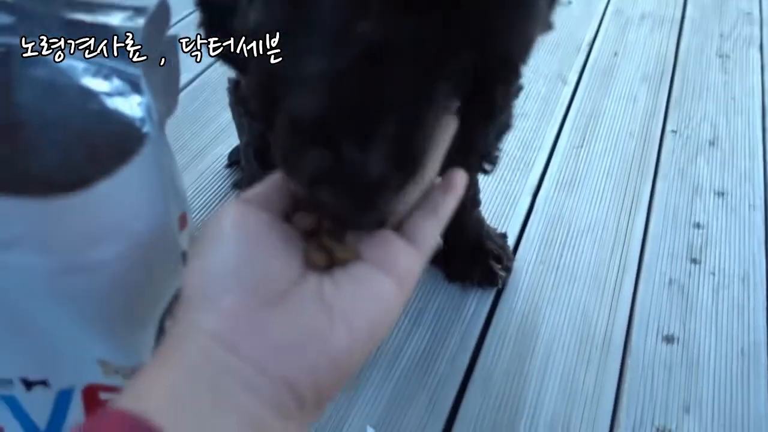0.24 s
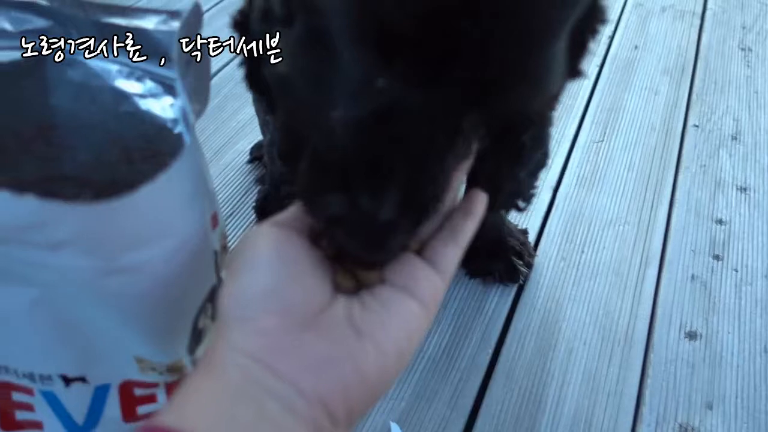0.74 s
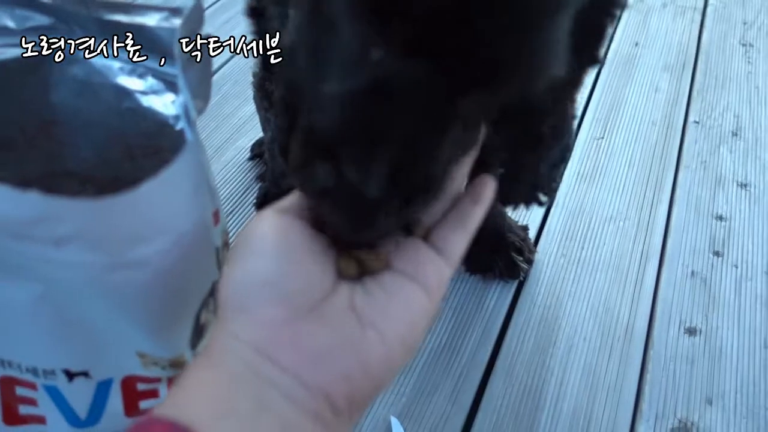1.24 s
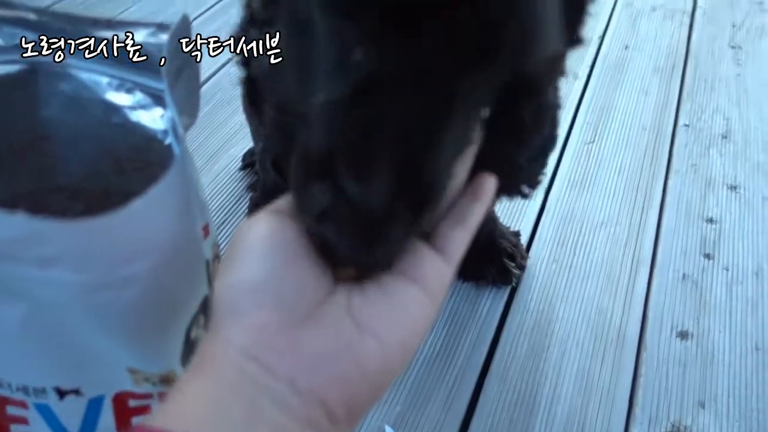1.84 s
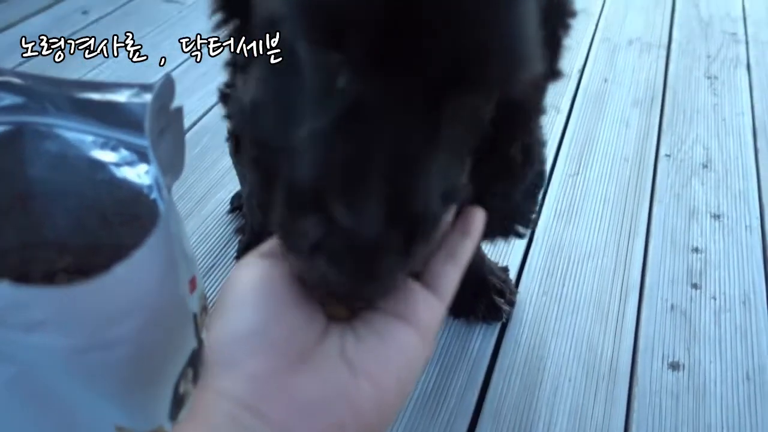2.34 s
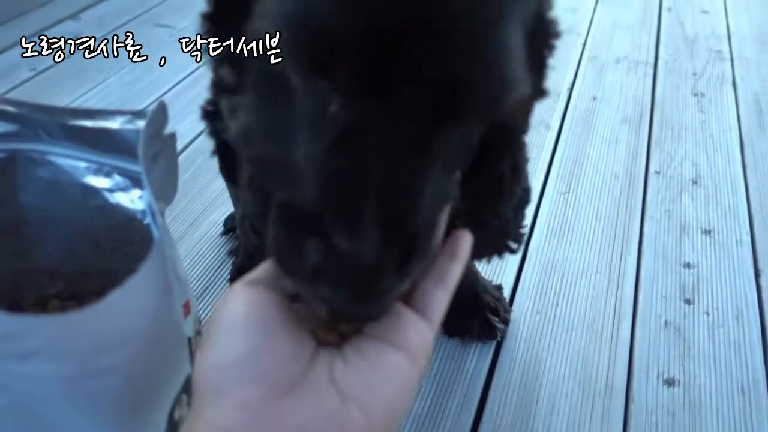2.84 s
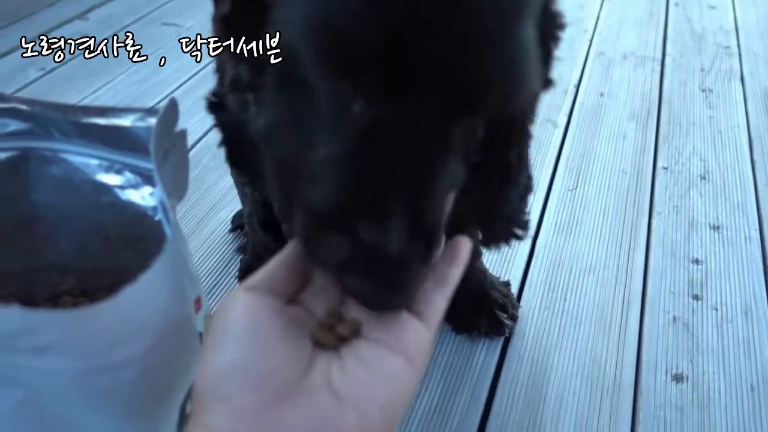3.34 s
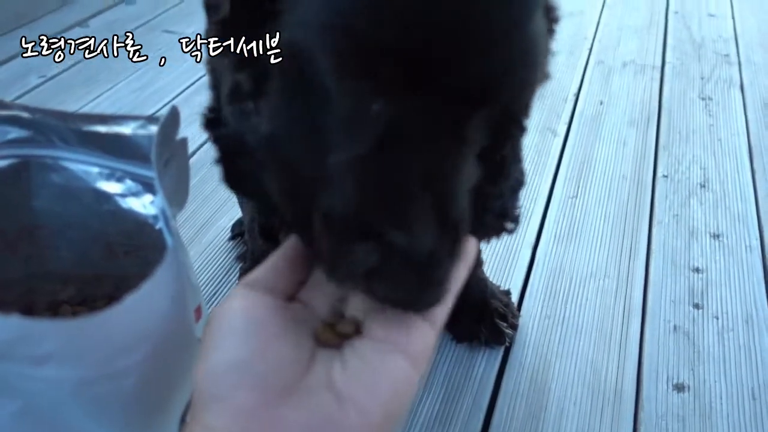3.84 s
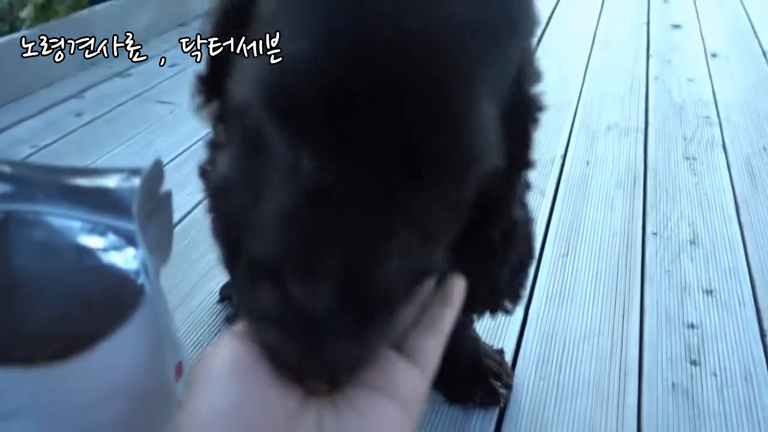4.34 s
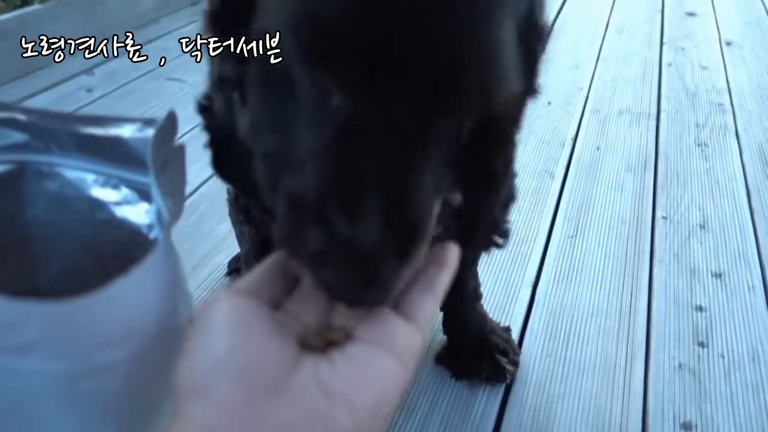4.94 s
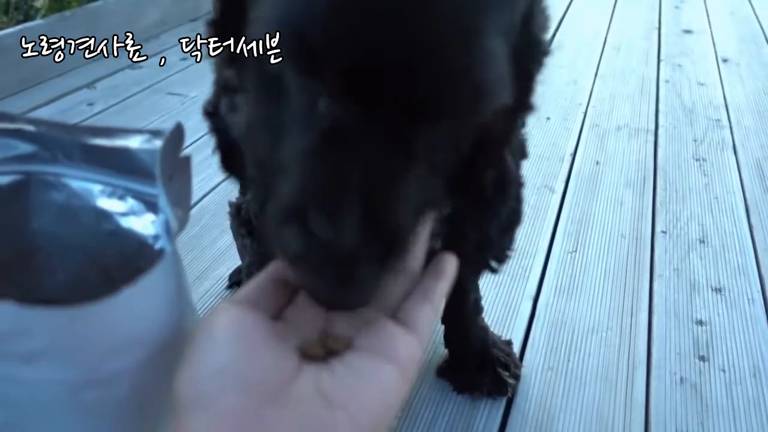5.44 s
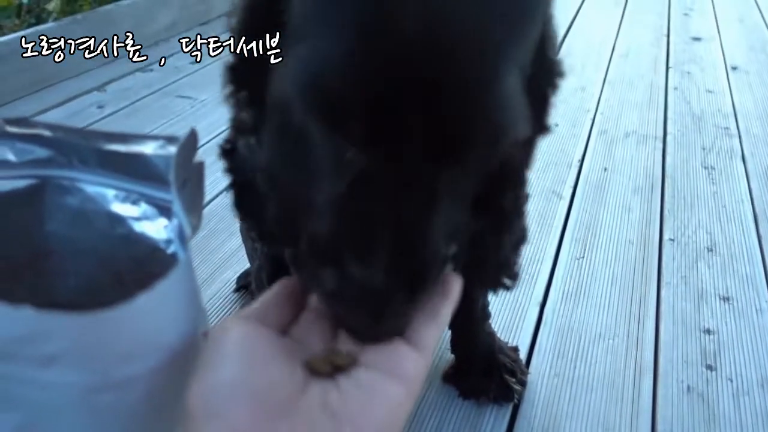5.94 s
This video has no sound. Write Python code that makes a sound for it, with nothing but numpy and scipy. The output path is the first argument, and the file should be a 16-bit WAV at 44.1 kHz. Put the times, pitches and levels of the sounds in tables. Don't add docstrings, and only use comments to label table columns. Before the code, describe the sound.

Dry pellets snap and splinter between a dog's teeth at close range, irregular, with short pauses. Bright ticks at the front teeth alternate with duller, hollow crushing at the back and gritty crumbs. The heaviest cracks come near the middle and again late, followed by small chewing. The open deck adds only a slight short scatter; soft far traffic, barely audible whines and steady hiss lie behind.

```python
import sys
import numpy as np
from scipy import signal
from scipy.fft import rfft, irfft, next_fast_len
from scipy.io import wavfile
from scipy.ndimage import uniform_filter1d, map_coordinates

SR = 44100
rng = np.random.default_rng(int(sys.argv[2]) if len(sys.argv) > 2 else 0)


def ratio(d):
    e = np.asarray(d, float) / 20
    return 10 ** e


def master_out(mix):
    frames = np.transpose(np.atleast_2d(mix))
    ceiling = np.clip(frames, -1, 1)
    pcm = np.round(ceiling * 32767).astype(np.int16)
    wavfile.write(sys.argv[1], SR, pcm)


N = 273067


def unit(x):
    return x / np.sqrt(np.mean(x ** 2) + 1e-20)


def crest(x):
    return x / (np.abs(x).max(axis=-1, keepdims=True) + 1e-20)


def along(points, hz):
    f, v = np.transpose(points)
    return np.interp(np.log(hz + 1), np.log(f + 1), v)


def curves(rows):
    s, *cols = np.transpose(rows)
    return [np.interp(np.arange(N) / SR, s, c) for c in cols]


def wobble(rate):
    knots = rng.standard_normal(int(N * rate / SR) + 4)
    return map_coordinates(knots, [np.arange(N) * rate / SR])


def filtered(x, response):
    n = x.shape[-1]
    m = next_fast_len(n + 4096)
    return irfft(rfft(x, m) * response(np.fft.rfftfreq(m, 1 / SR)), m)[..., :n]


def peak(f, centre_hz, width_hz):
    return 1j * f * width_hz / (centre_hz ** 2 - f * f + 1j * f * width_hz)


def body(f, modes, shift=1):
    return sum((-1) ** k * ratio(db) * peak(f, centre * shift, width)
               for k, (centre, width, db) in enumerate(modes))


# f/Hz, likeness [0..1]
LIKENESS = [(60, 0.36), (220, 1), (830, 0.87), (3090, 0.097), (11500, 0.02)]


def rush(spectrum, patchy_db):
    z = signal.stft(rng.standard_normal((2, N)), nperseg=512)[2]
    patches = uniform_filter1d(rng.standard_normal(z.shape[1:]), size=5, axis=0)
    patches = uniform_filter1d(patches, size=14, axis=1)
    pair = signal.istft(z * ratio(patchy_db * unit(patches)), nperseg=512)[1][:, :N]

    def mid_side(hz):
        angle = np.arccos(np.clip(along(LIKENESS, hz), -1, 1)) / 2
        return ratio(along(spectrum, hz)) * [np.cos(angle), np.sin(angle)]

    mid, side = filtered(pair, mid_side)
    return unit(np.array([mid + side, mid - side]))


# t/s, level/dB
TRAFFIC_NEARNESS = [(0, -3), (.4, -2), (1.1, -1.5), (1.7, -1.5), (1.96, -0.35), (2.35, -1.5), (3.1, 0.5),
                    (3.35, 1.5), (3.85, 1), (4.15, 0.2), (4.4, 1.5), (4.9, 0.14), (5.4, 0.36), (6.19, -0.8)]
# f/Hz, level/dB per Hz
DRONE_SPECTRUM = [(65, -38), (110, -24), (354, -4.5), (387, -4.5), (419, -3.5), (461, -0.5), (900, -11),
                  (1170, -10), (1980, -120)]
# f/Hz, level/dB per Hz
WASH_SPECTRUM = [(350, -33.5), (600, -5), (1090, -2), (1440, -2.5), (1770, -1), (3210, -8.5), (4300, -14.5),
                 (5000, -26), (6500, -55), (11000, -120)]
# f/Hz, level/dB per Hz
AIR_SPECTRUM = [(2470, -28.5), (4200, -1.5), (4990, -10), (10400, -17), (11000, -16), (14300, -57),
                (22000, -120)]
WASH_DB, DRONE_DB, AIR_DB = -55, -60.5, -63.5
DRONE_GROWS, TRAFFIC_LEFT_DB = 2.1, 2.15
HISS_TOP_HZ = 11080


def outdoors():
    near_db, = curves(TRAFFIC_NEARNESS)
    drone_db = DRONE_DB + DRONE_GROWS * near_db + .8 * wobble(6)
    drone = ratio(drone_db) * rush(DRONE_SPECTRUM, patchy_db=1.5)
    wash_db = WASH_DB + near_db + 1.5 + .5 * wobble(8)
    wash = ratio(wash_db) * rush(WASH_SPECTRUM, patchy_db=1.2)
    hiss = ratio(AIR_DB + .6 * wobble(5)) * rush(AIR_SPECTRUM, patchy_db=1.2)
    lean = ratio([[TRAFFIC_LEFT_DB / 2], [-TRAFFIC_LEFT_DB / 2]])
    return filtered((drone + wash) * lean + hiss,
                    lambda f: (f < HISS_TOP_HZ) / np.sqrt(1 + (85 / (f + 1)) ** 4))


# start t/s, length t/s, start f/Hz, end f/Hz, level/dB
VEHICLE_WHINES = [
    (3.35, .17, 392, 386, -60),
    (3.39, .1, 515, 530, -61),
    (3.51, .2, 610, 600, -61),
    (6.06, .105, 1845, 1840, -56),
]


def whines():
    t, out = np.arange(N) / SR, np.zeros(N)
    for start, length, from_hz, to_hz, db in VEHICLE_WHINES:
        u = np.clip((t - start) / length, 0, 1)
        pitch_hz = from_hz + (to_hz - from_hz) * u + 5 * wobble(25)
        tone = np.sqrt(2) * np.sin(2 * np.pi * np.cumsum(pitch_hz) / SR)
        out += ratio(db) * np.sqrt(np.sin(np.pi * u).clip(0)) * tone
    return out


# f/Hz, time to fall 60 dB t/s
DECK_DECAY = [(500, 0.1), (2000, 0.081), (8000, 0.08)]


def deck(x):
    hz, t, z = signal.stft(rng.standard_normal((2, SR // 5)), SR, nperseg=128)
    fade = ratio(-60 * t / along(DECK_DECAY, hz)[:, None])
    tail = signal.istft(z * fade, SR, nperseg=128)[1]
    late = np.pad(x, (60, 0))[None]
    return signal.fftconvolve(late, tail / np.linalg.norm(tail[0]), axes=1)[:, :N]


# start t/s, end t/s, level/dB
GRIND_STROKES = [(.08, 0.134, -69), (0.162, 0.31, -59), (0.656, 0.687, -54), (0.875, 0.923, -60),
                 (1.136, 1.197, -58), (1.69, 1.71, -54), (1.955, 2.012, -59), (2.462, 2.6, -57.5),
                 (3.01, 3.09, -53), (3.16, 3.21, -81), (3.69, 3.87, -62.5), (4.012, 4.133, -70),
                 (4.255, 4.282, -52), (4.34, 4.414, -59), (4.51, 4.553, -47), (4.8, 4.853, -65),
                 (5.45, 5.533, -55.5), (5.535, 5.64, -50.5), (5.886, 5.925, -49), (5.932, 6.046, -54.5),
                 (1.393, 1.43, -54)]
# first t/s, last t/s, level/dB, ring f/Hz, brightness level/dB
CHIP_RUNS = [(0.0866, 0.099, -45.5, 3880, 6), (0.126, 0.138, -45.5, 3150, -2),
             (0.194, 0.2125, -37.5, 2950, -6), (0.254, 0.276, -41.5, 2370, -3),
             (0.883, 0.897, -46.5, 2280, -21), (1.16, 1.188, -42, 2320, -19),
             (1.687, 1.6985, -41.5, 2570, -18), (1.853, 1.8686, -45, 2530, -27),
             (1.9537, 1.9716, -42.5, 2450, 6), (1.995, 2.002, -47.5, 2150, -23),
             (2.237, 2.2624, -43, 2120, -1.5), (2.51, 2.5743, -37.5, 2260, -19),
             (2.93, 2.963, -38.5, 2120, 2), (3.018, 3.0567, -36, 3400, -20),
             (3.1712, 3.188, -43, 1800, -32), (3.362, 3.408, -57, 2600, 13.5),
             (4.027, 4.032, -42.5, 3240, -6), (4.0815, 4.1193, -41.5, 2450, -8),
             (4.81, 4.8286, -38, 3020, -10), (5.4564, 5.494, -44.5, 3680, 13),
             (5.564, 5.5906, -43.5, 2600, 7), (5.622, 5.642, -45.5, 4050, 2),
             (5.693, 5.703, -36, 3000, -2.5), (5.893, 5.917, -40, 2500, -4)]
# f/Hz, width f/Hz, level/dB
TEETH_MODES = [(1850, 330, 4.5), (2450, 1410, 6), (3560, 2000, 1.5), (4740, 650, -12)]
# f/Hz, width f/Hz, level/dB
SPLINTER_MODES = [(5740, 660, -19), (6330, 2420, 12), (8750, 4600, 10.5), (10500, 180, 13)]


def crumbs():
    t = np.arange(N) / SR
    run_ends = np.round(np.transpose(CHIP_RUNS)[:2].ravel() * SR).astype(int)
    near = np.bincount(run_ends, minlength=N)
    effort = ratio(-65.0) * signal.fftconvolve(near, np.hanning(SR // 20), "same").clip(0) ** .5
    for start, end, db in GRIND_STROKES:
        u = np.clip((t - start) / (end - start), 0, 1)
        effort += ratio(db) * np.sin(np.pi * u).clip(0) ** .5
    chance = rng.random((3, N))
    size = ratio(-3 * np.log(chance[1] + 1e-3)) * np.sign(chance[2] - .5)
    grains = (chance[0] < 2500 / SR) * size

    def mouth(f):
        tone = body(f, TEETH_MODES) + ratio(-17.0) * body(f, SPLINTER_MODES) + ratio(20.5) * peak(f, 1065, 130)
        return tone * peak(f, 4200, 4000) * (f < HISS_TOP_HZ)

    return effort * unit(filtered(grains, mouth))


# t/s, level/dB, ring f/Hz, mouth cavity level/dB, brightness level/dB
PELLET_BITES = [(.0747, -23, 3920, -34, 4.5), (0.7614, -25, 3120, -34, 5), (1.1441, -21.5, 2760, -14, -8.5),
                (1.4078, -24.5, 1850, -14.5, -32), (1.4096, -28, 2950, -32, -1),
                (2.22, -25, 2180, -12, -5.5), (2.459, -27, 2150, -3.2, -61),
                (2.7229, -15, 3930, -1.6, -6.5), (2.7249, -12.5, 1510, -22, -3),
                (2.8528, -30, 3000, 5.5, -8), (3.062, -29, 2470, -12.5, -16),
                (3.1959, -16, 3600, 0.4, -2.5), (4.5148, -21, 2140, -13, -6.5),
                (4.5175, -19, 2140, -16, -1.5), (4.5204, -18.5, 2800, -24, -28), (5.183, -28, 4070, -19, 0),
                (5.1842, -20, 2230, -3, 0.5), (5.229, -20.5, 3740, -0.2, -2), (5.2631, -11, 1730, -8, -11),
                (5.2637, -17, 3520, -7, -1.5), (5.2694, -26, 3550, -4, 1), (5.3099, -17, 3430, -15, -4),
                (5.3125, -19, 1740, -4, 1), (6.1844, -27, 2450, -6, -11)]
# t/s, level/dB, ring f/Hz, brightness level/dB
FRONT_SNAPS = [(.0074, -28.5, 3300, -8), (.107, -31.5, 3400, -16), (0.1193, -41, 3080, -21),
               (.199, -28, 2250, -24), (0.228, -30, 2230, -25), (0.245, -30, 2600, -1),
               (0.2625, -33, 2490, -1), (0.53, -44.5, 2900, -29), (.658, -33.5, 2500, 7),
               (.7476, -39, 2760, -31), (1.0242, -30.5, 3040, 3.2), (1.1549, -29.5, 1870, -22),
               (1.1988, -31.5, 2920, -24), (1.2878, -36.5, 3060, 4), (1.738, -42, 4760, 19),
               (1.9578, -37, 3000, -5), (2.0213, -43, 2800, 0), (2.0934, -34.5, 3000, 7.5),
               (2.1055, -39.5, 2830, 6.5), (0.562, -50, 4480, -17), (2.502, -34.5, 2760, -11),
               (3.433, -39.5, 4400, -7), (1.7774, -44, 2800, -23), (4.562, -40, 3750, -2),
               (4.5772, -29.5, 2780, -4), (5.347, -34.5, 1500, -3), (5.446, -36, 4800, 5),
               (5.5087, -43.5, 4430, 8), (5.8856, -29.5, 1400, -9), (5.9088, -32.5, 2150, -5)]
# t/s, level/dB, ring f/Hz, brightness level/dB
BACK_CHEWS = [(0.6853, -40.5, 3420, -2), (.89, -36.5, 1890, -19), (0.905, -37.5, 1910, -12),
              (1.0031, -45.5, 2990, -21), (1.4167, -36, 2690, -17), (1.6953, -32.5, 2500, -22),
              (1.7495, -41.5, 2100, -5), (2.228, -32.5, 2840, 2), (2.2562, -34.5, 1830, -12),
              (2.5235, -38.5, 2000, 4.5), (2.562, -37, 2450, -23), (2.623, -35.5, 3470, -2),
              (2.7359, -30, 2900, -15), (2.7981, -27.5, 1360, -9), (2.8585, -29.5, 3080, 0),
              (2.9469, -32.5, 2970, -5), (3.0326, -40, 2690, 5), (3.0959, -31, 2640, -3),
              (3.0991, -30.5, 3060, 0), (3.7032, -41.5, 2800, -25), (4.0167, -35.5, 2050, -20),
              (4.174, -37, 2740, -9), (4.3899, -35.5, 1470, -32), (4.5298, -34, 2560, -18),
              (4.8189, -38, 2820, -12), (4.844, -33.5, 2920, -3), (5.4733, -30, 4200, -2),
              (5.5665, -40, 3480, 10), (5.7059, -32.5, 3570, 2.5), (6.1788, -29, 2850, 1.5)]
SNAP_MOUTH_DB, CHEW_MOUTH_DB, CHIP_MOUTH_DB = -20.5, -6.5, -12
BITE_MS, SNAP_MS, CHEW_MS, CHIP_MS = 1.77, 1.35, 1.77, 2.35
TICK_MS, TICK_DB = 5.9, -27
CHIP_DB, CHIP_HZ = 2.5, 0.19


def breaks():
    rows = [(*bite, BITE_MS) for bite in PELLET_BITES]
    rows += [(s - TICK_MS / 1000, db + TICK_DB, hz, CHIP_MOUTH_DB, bright, CHIP_MS)
             for s, db, hz, _, bright in PELLET_BITES]
    rows += [(s, db, hz, SNAP_MOUTH_DB, bright, SNAP_MS) for s, db, hz, bright in FRONT_SNAPS]
    rows += [(s, db, hz, CHEW_MOUTH_DB, bright, CHEW_MS) for s, db, hz, bright in BACK_CHEWS]
    places = rng.random(len(CHIP_RUNS))
    scatter = rng.standard_normal((len(CHIP_RUNS), 3, 2))
    for (first, last, db, hz, bright), place, vary in zip(CHIP_RUNS, places, scatter):
        for u, (loud, pitch) in zip((0, (1 + 2 * place) / 4, 1), vary):
            rows.append((first + u * (last - first), db + CHIP_DB * loud, hz * np.exp(CHIP_HZ * pitch),
                         CHIP_MOUTH_DB, bright, CHIP_MS))
    return np.array(rows)


# t/s, pitch f/Hz, width f/Hz, openness for small pieces level/dB
MOUTH_SHAPE = [(0, 980, 250, -3), (1.3, 980, 199, -1.5), (2.45, 970, 126, 0.2), (2.75, 952, 108, -1.5),
               (2.85, 1070, 152, -4), (3.1, 1000, 171, 3.5), (3.2, 1204, 500, 12), (4.5, 990, 200, -1),
               (5.2, 1236, 240, -.6), (5.47, 1175, 110, 7.5), (5.6, 1110, 110, 8), (5.7, 1150, 200, 0),
               (6.19, 1070, 298, 1)]
CRUMBLE = 0.096
THUD_DB, THUD_MS = -31, 0.52


def cracks():
    s, level_db, ring_hz, mouth_db, bright_db, base_ms = breaks().T[:, :, None]
    length_ms = base_ms * ratio(-CRUMBLE * bright_db)
    lead = SR // 200
    t = (np.arange(SR // 25) - lead) / SR * 1000
    chance = rng.random((len(s), 2, len(t)))
    shift = np.exp(.06 * rng.standard_normal((len(s), 3)))

    fade_db = np.where(t < 0, 22 * t, -7 * t) / np.clip(length_ms, .2, 9)
    train = (chance[:, 0] < 2500 / SR) * (2 * chance[:, 1] - 1) * ratio(fade_db)
    train[:, lead] = -1

    ring_width_hz = (0.11 + 0.091 / np.clip(length_ms, .5, 9)) * ring_hz

    def pellet_and_teeth(f):
        tone = peak(f, ring_hz, ring_width_hz) + ratio(-8.5) * body(f, TEETH_MODES, shift[:, :1])
        return tone * peak(f, ring_hz, 1400) * peak(f, 3600, 5300)

    mouth_s, *shape = np.transpose(MOUTH_SHAPE)
    mouth_hz, width_hz, open_db = (np.interp(s, mouth_s, v) for v in shape)
    small = (np.arange(len(s)) >= len(PELLET_BITES))[:, None]
    mouth_db = mouth_db + open_db * small

    def cavity(f):
        jaw = ratio(-17) * peak(f, 575, 130) * peak(f, 575, 400)
        return peak(f, mouth_hz, width_hz) * peak(f, mouth_hz, 790) + jaw

    def splinters(f):
        return body(f, SPLINTER_MODES, shift[:, 1:2]) * peak(f, 4500, 5000)

    ring = crest(filtered(train, pellet_and_teeth))
    hollow = crest(filtered(train * ratio(-5 * np.abs(t)), cavity))
    bright = crest(filtered(train, splinters))
    sound = ratio(level_db + 1.0) * (ring + ratio(mouth_db + 0.5) * hollow + ratio(bright_db - 6.0) * bright)
    push = (t / THUD_MS).clip(0)
    sound += ratio(level_db + THUD_DB) * push * (2 - push) * np.exp(-push)

    at = (np.round(s * SR).astype(int) + np.arange(len(t))).ravel()
    sides = [sound * shift[:, 2:] ** (0.93 * side) for side in (1, -1)]
    return np.array([np.bincount(at, v.ravel(), N + SR)[lead:][:N] for v in sides])


def scene():
    chew = cracks() + crumbs()
    return chew + ratio(-19.0) * deck(chew.mean(axis=0)) + outdoors() + whines()


def roll_off(x):
    return signal.sosfilt(signal.butter(12, 12100, fs=SR, output="sos"), x)


def record(dry):
    delay = np.array([[0], [.8]]) / SR

    def ports(f):
        return np.exp(-2j * np.pi * f * delay) / np.sqrt(1 + (f / 11200) ** 64)

    return roll_off(filtered(dry, ports))


dry = scene()
out = record(dry)
master_out(out)
```